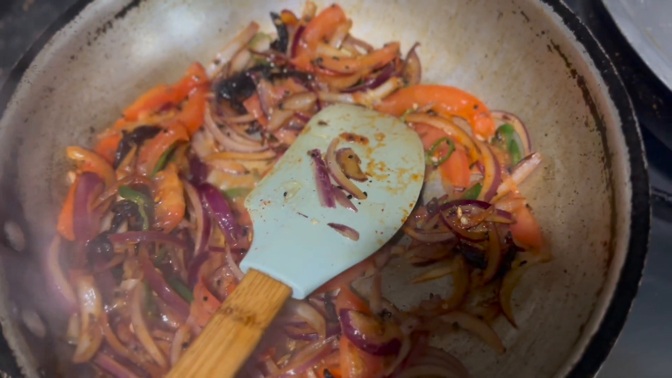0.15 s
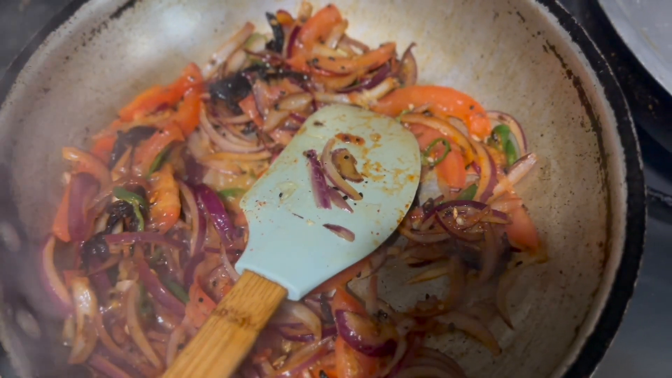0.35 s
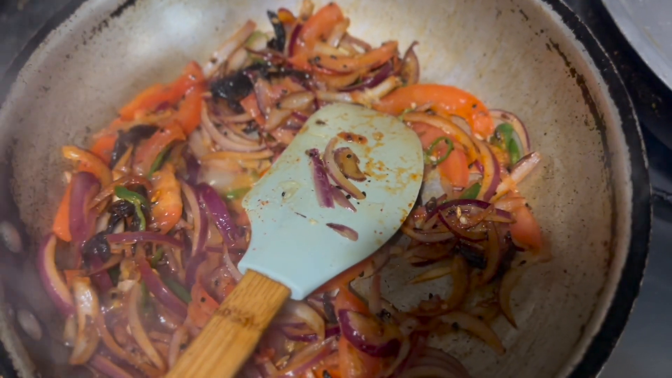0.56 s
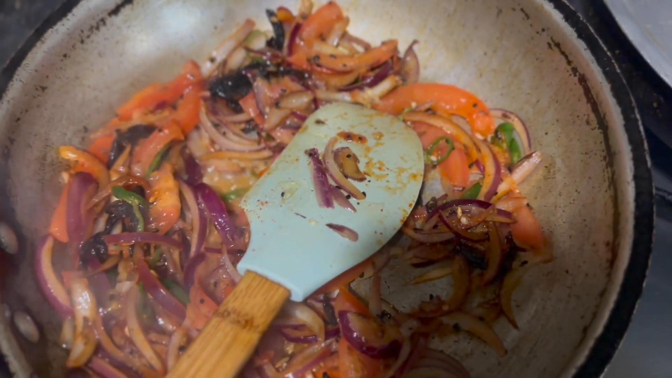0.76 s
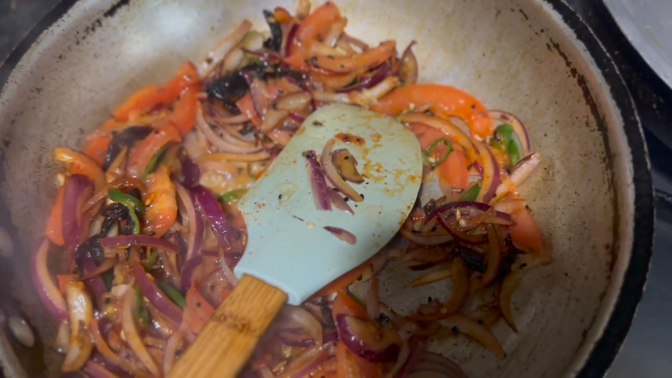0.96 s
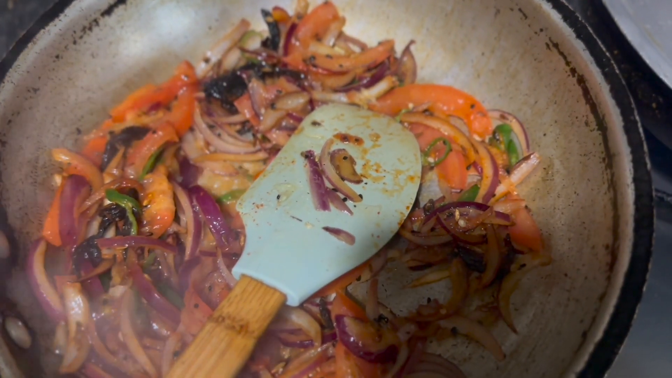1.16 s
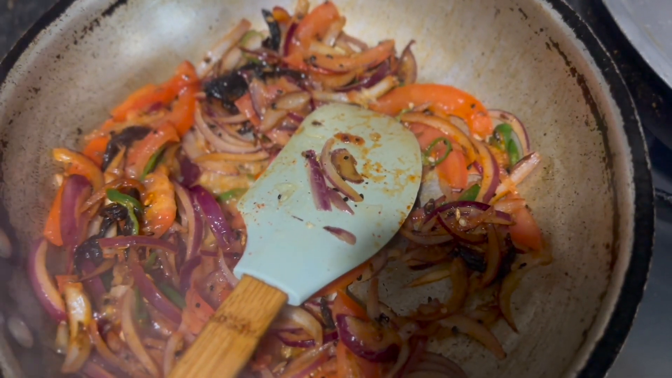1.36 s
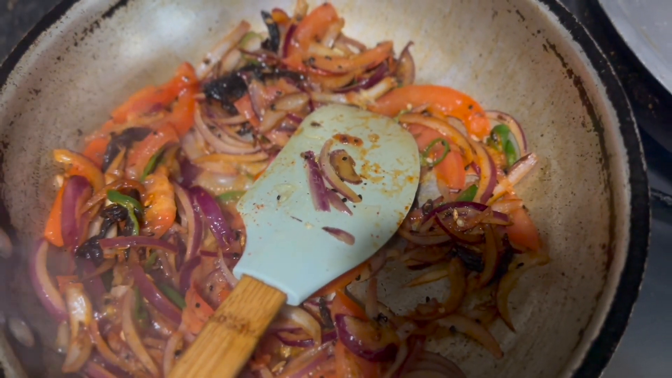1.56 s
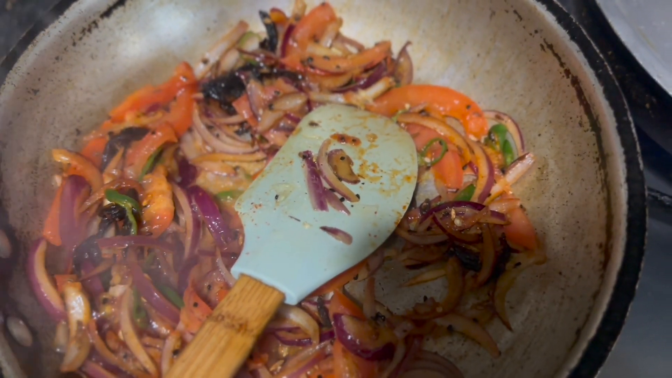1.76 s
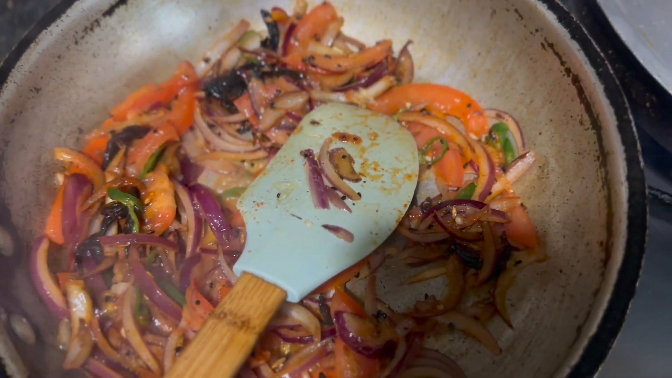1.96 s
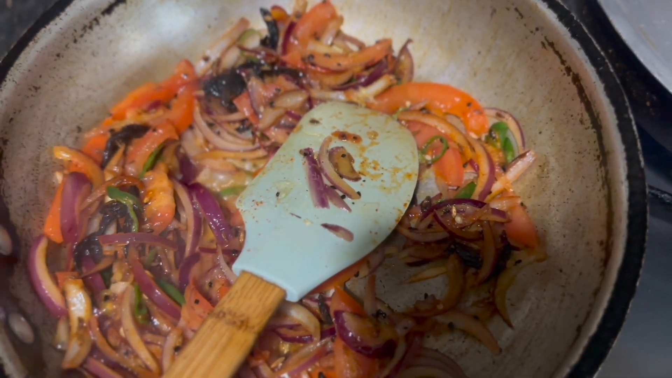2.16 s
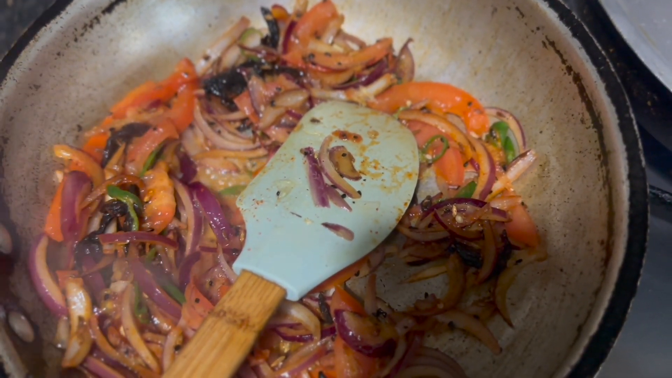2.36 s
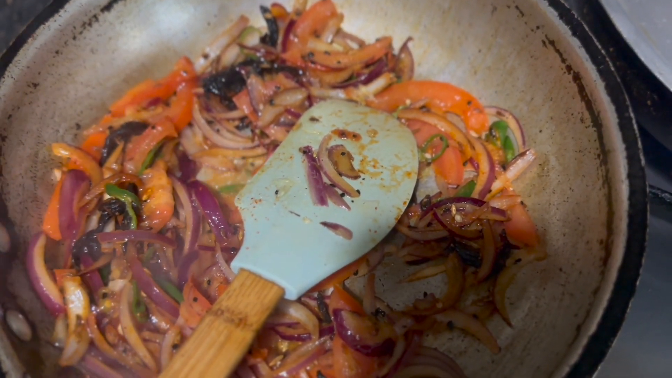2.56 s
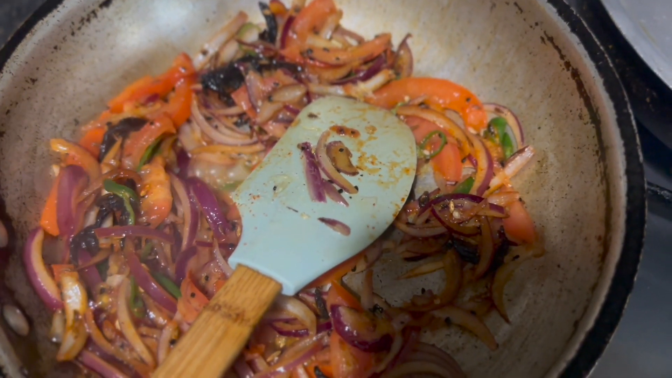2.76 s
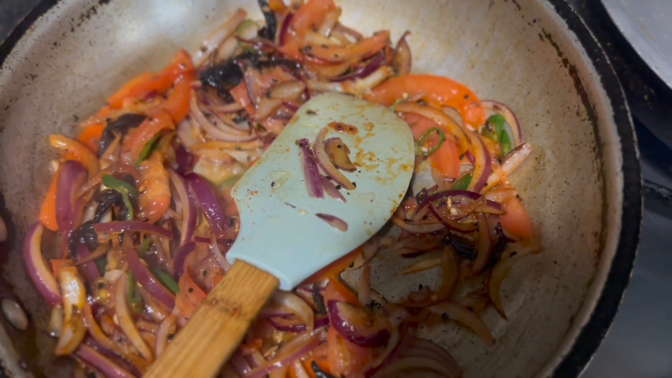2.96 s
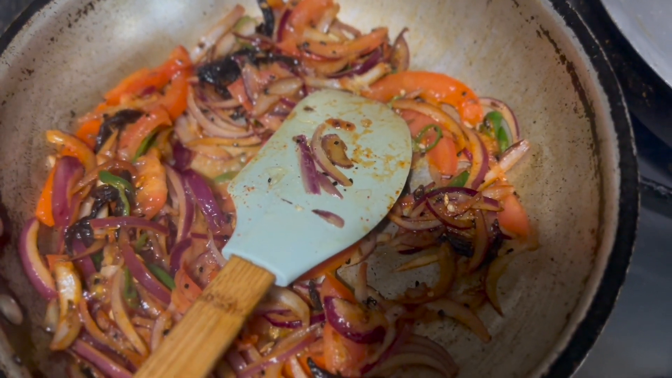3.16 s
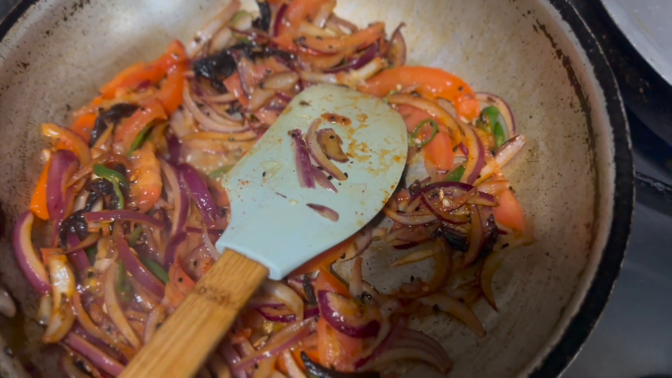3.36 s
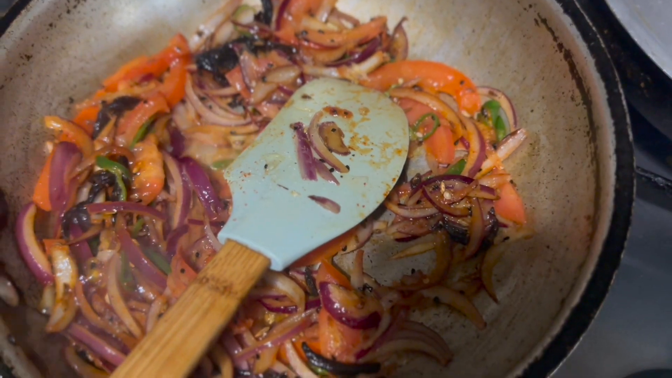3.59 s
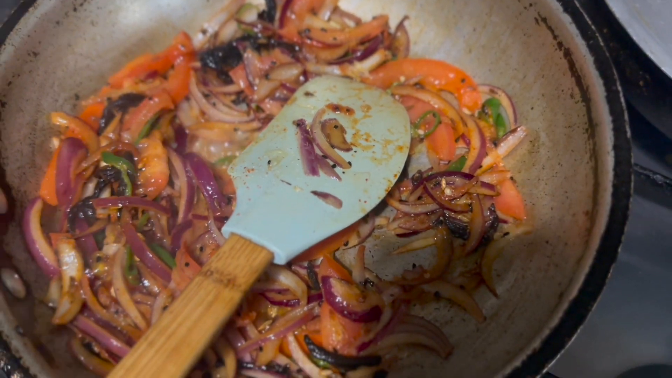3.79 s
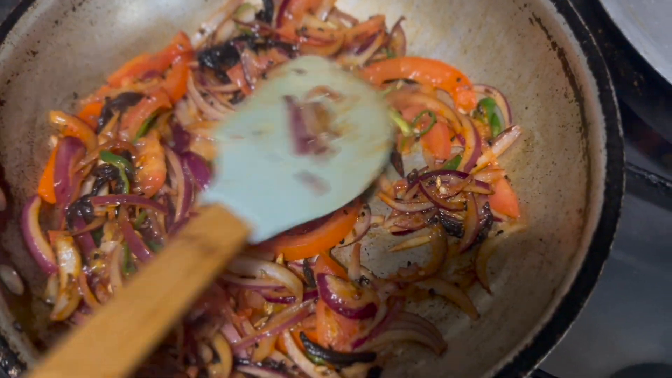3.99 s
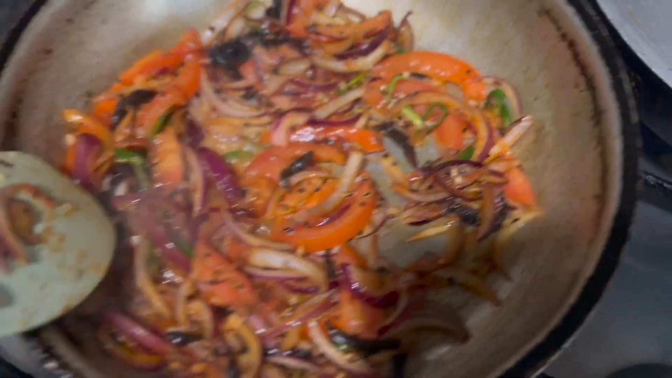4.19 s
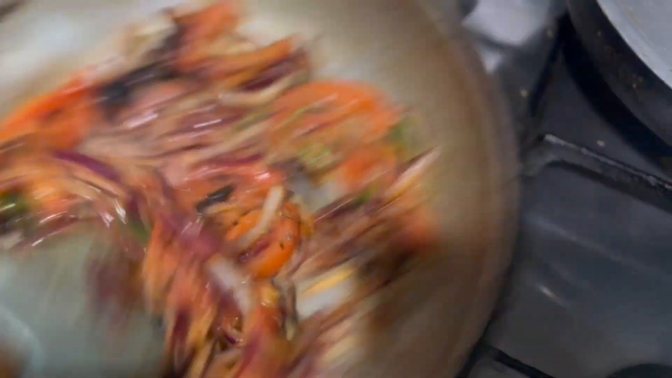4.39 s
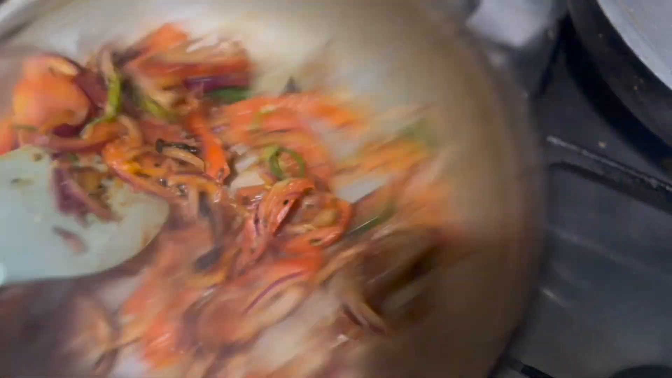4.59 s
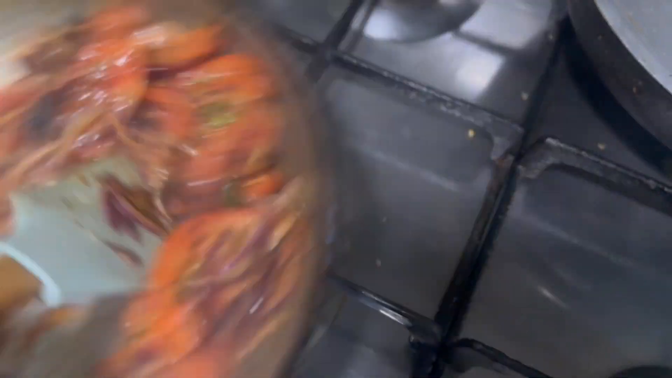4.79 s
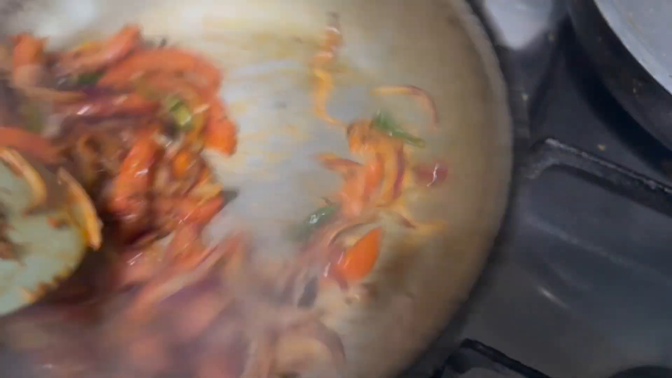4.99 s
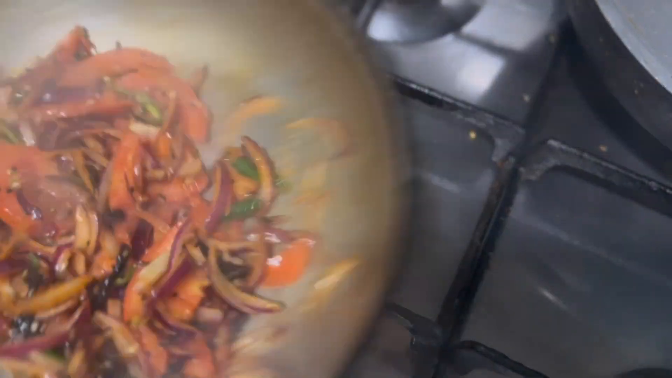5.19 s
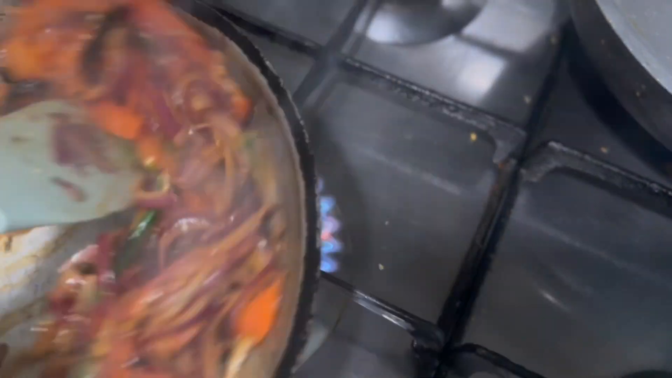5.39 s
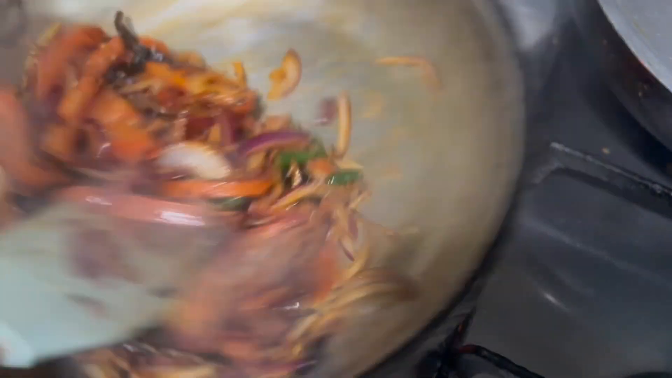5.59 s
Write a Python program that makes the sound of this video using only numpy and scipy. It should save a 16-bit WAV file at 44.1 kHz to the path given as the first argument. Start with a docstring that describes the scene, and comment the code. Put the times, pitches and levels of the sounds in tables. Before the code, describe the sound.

Steady wet frying fills the first four seconds, crisp and fizzy, sinking very slightly, with barely noticeable low handling bumps and a quiet gas flame. Then brisk stirring takes over: a soft-bladed spatula rubs and stutters across the metal, knocks it with short ringing clacks, thumps dully and crunches the slices, while wet food hisses louder. Heard from just above the pan, wide in stereo, with little room.

```python
"""At a gas stove, just above a metal pan: sliced onion and tomato fry, and after four seconds get stirred.
Countless tiny steam bursts, made as random clicks through resonances, sizzle and spit over the low flutter
of the burner, which is filtered noise. A silicone spatula scrapes in juddering slips and knocks in short
falling tones that ring the pan's modes. Dull low thuds are decaying tones, soft at first and firm once the
stirring starts; slices crunch, and wet food on hot metal lifts the sizzle and flares into hiss."""
import sys
import numpy as np
from scipy import signal
from scipy.fft import rfft, irfft, next_fast_len
from scipy.io import wavfile
from scipy.ndimage import uniform_filter1d

SR = 44100
rng = np.random.default_rng(int(sys.argv[2]) if len(sys.argv) > 2 else 0)


def digitize_waveform(pressure):
    """Quantize a signal to 16-bit integers and store it at the path in sys.argv[1].

    Rows of a 2-D input are taken as channels; values are limited to [-1, 1].
    """
    field = np.atleast_2d(pressure).T
    bounded = np.clip(field, -1, 1)
    quanta = np.round(bounded * 32767).astype(np.int16)
    wavfile.write(sys.argv[1], SR, quanta)


N = 248724
T = np.arange(N) / SR  # s
# padded transform length and its frequencies, nudged off zero for the logarithm
SIZE = next_fast_len(N + SR // 2)
HZ = np.arange(SIZE // 2 + 1) * SR / SIZE + 1e-3
TOP_HZ = 15780  # upper edge of the whole sound

# colour of the fine sizzle: pitch_hz, relative_density_db_per_hz
SIZZLE_COLOUR = [(3000, -30), (6500, -14), (7400, -6), (8400, -.5), (9500, 0), (10900, 0), (12000, -2.7),
                 (13000, -3.2), (14300, -1.7), (15700, -1.5), (16500, -40)]
# colour of the coarse, wet fizz: pitch_hz, relative_density_db_per_hz
FIZZ_COLOUR = [(150, -21.5), (330, -8), (470, -8.5), (640, -13), (800, -4.5), (1150, -6.5), (2000, -1),
               (2450, -2.5), (3300, 0.5), (4000, -2), (5000, -0.5), (6300, -1.5), (9000, -7), (15000, -21)]
# hollow of the pan that colours the fizz: pitch_hz, width_hz, level_db
PAN_HOLLOW = [(760, 47, -5.5), (924, 140, -7.5), (1380, 34, 4), (1477, 14, 4.5), (1847, 4, 4),
              (3743, 16, 1)]
# how hard the food is being turned as the spatula lifts and digs in: time_s, amount_0_to_1
STIRRING = [(3.85, 0.09), (4.22, 0.17), (4.39, 0.65), (4.48, 0.82)]
# wet clumps landing on hot metal: start_s, end_s, level_db, centre_hz, width_hz (of each of two filter passes)
FLARES = [(4.42, 4.482, -28, 13400, 3500), (4.446, 4.552, -27.5, 7550, 8000),
          (4.52, 4.63, -24.5, 13700, 3500), (4.62, 4.738, -23.5, 8100, 11300),
          (4.76, 4.81, -30, 13000, 7000), (4.75, 4.876, -29.5, 5600, 6000),
          (4.853, 4.937, -20.5, 8000, 7150), (4.936, 5.083, -27, 12800, 6500),
          (5.015, 5.07, -26.5, 5070, 5030), (5.145, 5.22, -25, 13800, 4000),
          (5.246, 5.328, -33, 13600, 3500), (5.458, 5.55, -26, 7900, 8000), (5.49, 5.63, -30, 13100, 4994)]
# spatula strokes: start_s, end_s, rub_db, rub_hz, pitch_bend_share (over the stroke), rasp_db, rasp_hz,
# judder_db, judder_rate_hz (mean)
STROKES = [(4.354, 4.472, -36, 598, 0.03, -54, 1800, -31.5, 125),
           (4.558, 4.59, -33, 477, -0.008, -45, 1750, -34, 124.9),
           (4.612, 4.652, -25.5, 440, -0.097, -25.5, 2430, -25.5, 154.9),
           (4.701, 4.722, -32, 620, 0.04, -26, 1680, -30, 120),
           (4.768, 4.82, -25.5, 556, -0.06, -26.5, 2350, -25, 150),
           (4.882, 4.915, -28.5, 600, 0.0072, -24.5, 1870, -30, 125.1),
           (4.931, 4.96, -24.5, 460, -0.09, -27.5, 1750, -26, 150),
           (5.078, 5.112, -36, 585, 0.034, -25.5, 1840, -32, 130),
           (5.158, 5.22, -29, 380, -0.0545, -29, 2920, -23, 151.9),
           (5.335, 5.38, -27, 580, -0.017, -30.5, 1797, -24, 147.9),
           (5.44, 5.47, -29, 721, -0.034, -28, 1800, -34, 140),
           (5.481, 5.517, -27.5, 540, 0.083, -26, 2800, -24, 144.8)]
# modes the pan rings with: pitch_hz, relative_level_db, t60_s
PAN_MODES = [(294, 8, 0.11), (338, 7, 0.09), (421, 6.5, 0.086), (476, 9, 0.066), (603, -1, 0.014),
             (683, 6.5, 0.06), (769, 5.5, 0.09), (1810, 10.5, 0.066), (1720, 7, 0.052), (2307, 12.5, 0.094),
             (2466, 7, 0.057), (2990, 8, 0.019), (3750, 12, 0.039), (4430, 10, 0.05)]
# spatula knocks: start_s, level_db, settled_pitch_hz, damping_width_hz, tick_db
KNOCKS = [(4.4035, -18, 650, 130, -31), (4.565, -27, 477, 130, -36), (4.6074, -9.5, 622, 180, -6),
          (4.612, -15, 350, 120, -28), (4.645, -20, 2150, 500, -14), (4.658, -6, 4100, 550, -11),
          (4.706, -26, 660, 110, -28), (4.7198, -23, 1600, 500, -11), (4.7645, -18, 520, 260, -12),
          (4.7885, -16, 640, 170, -20), (4.896, -17, 1700, 170, -12), (4.941, -19, 430, 160, -16),
          (5.1008, -17, 480, 250, -11), (5.161, -24, 640, 160, -24), (5.3128, -15, 550, 189.7, -30),
          (5.3378, -15, 577, 180, -19), (5.3632, -19, 650, 200, -24), (5.452, -23, 640, 129.7, -25),
          (5.484, -20, 490, 150, -23), (5.5488, -13, 1300, 500, -8)]
# dull low thuds, soft at first, firm once the stirring starts:
# start_s, relative_level_db, settled_pitch_hz, t60_s, relative_squash_db
THUDS = [(0.453, -39, 188, 0.11, -50), (0.531, -30, 181, 0.13, -40), (0.553, -30, 114, 0.058, -44),
         (.572, -42, 129, 0.11, -49), (0.887, -40, 408, 0.11, -45), (2.09, -41.5, 175, 0.26, -47.5),
         (2.158, -36.5, 88, 0.59, -56), (2.469, -36, 120, .1, -47), (2.566, -36, 103, 0.12, -61),
         (3.262, -35.5, 108, 0.18, -47), (3.347, -33.5, 114, 0.11, -48), (3.729, -39.5, 240, 0.076, -55),
         (4.008, -33, 113, 0.088, -56), (4.213, -32.5, 278, 0.052, -40), (4.322, -35, 120, .2, -48),
         (4.414, -21.5, 130, .1, -29.5), (4.619, -9.5, 136, 0.059, -27), (4.6686, -13, 85, .1, -34),
         (4.7304, -12.5, 92, .105, -31), (4.822, -18, 100, 0.097, -30), (4.908, -19.5, 96, .085, -32),
         (5.006, -27, 110, .12, -40), (5.113, -12.5, 128, 0.061, -28), (5.32, -22, 128, 0.088, -36),
         (5.386, -21, 120, 0.098, -38), (5.466, -27, 112, .07, -38), (5.5609, -11, 119, 0.084, -31)]
# roar of the gas flame: pitch_hz, relative_density_db_per_hz
FLAME_COLOUR = [(18, -34), (40, -1), (65, 3), (100, 6.5), (150, -1.5), (220, -13.5), (450, -21), (900, -34)]
# stereo image by pitch, nearly mono at 10-13 kHz: pitch_hz, left_minus_right_db, likeness_0_to_1
STEREO_IMAGE = [(94, 1.1, 0.97), (239, 3.5, 0.84), (417, 2, 0.64), (676, 6, 0.03), (950, 5, 0.88),
                (1420, 2.5, 0.33), (2000, 1.5, 0.25), (3050, 2, 0.34), (4450, 5, 0.36), (6000, 3, 0),
                (7800, 5, 0.56), (9960, -2.5, 0.35), (10130, 2, 1), (12900, -1, 1), (15000, 0.5, 0.45)]
# stereo phase by pitch: pitch_hz, left_lead_rad
STEREO_PHASE = [(150, 0), (500, .4), (850, 0), (1400, .7), (2400, 2.8), (3300, 3), (4600, 0), (6300, 1),
                (7800, 2.4), (10500, .1), (13400, -.2), (15700, -2.5)]

# starting points for the frying layers, and how fast they sink as the food dries
SIZZLE_BASE_DB, FIZZ_BASE_DB, DRYING_DB_PER_S = -30, -33, 0.41
# lift from fresh food on the metal, per unit of stirring
STIR_SIZZLE_DB, STIR_FIZZ_DB = 6, 6
FLARE_RISE_S, FLARE_FALL_S = 0.02, 0.047
JUDDER_LAG_S = 0.013  # the blade starts to judder this long after a stroke begins
FLAME_DB = -50


def frying(fine_db=1.5, wet_db=3.0, spit_db=-15.5, pop_db=-15, grain_db=-10, flicker_db=0.5, heap_db=4.0):
    """Steam bursts through the oil: fine sizzle thickened by ringing grains, coarse fizz, spits and pops."""
    sizzle_db, fizz_db = frying_levels()
    fine, = spectra(SIZZLE_COLOUR)
    coarse, = spectra(FIZZ_COLOUR)
    hollow = 1 + sum(undb(db) * resonance(hz, width) for hz, width, db in PAN_HOLLOW)
    sizzle = unit(filtered(bursts(16000, 2.6), undb(fine))) * undb(fine_db)
    fizz = unit(filtered(bursts(12000, 3.8), undb(coarse) * hollow)) * undb(fizz_db + wet_db)
    spits = unit(filtered(bursts(45, 2.9), resonance(7300, 9000))) * undb(spit_db)
    # larger blisters of juice pop, each at its own pitch
    pops = ringing_grains(count=300, ring_s=0.00088, spread_db=2.0, glide=.05, low_hz=1200, high_hz=7430)
    top = sizzle + spits + pops * undb(pop_db) + ringing_grains() * undb(grain_db)
    top = top * undb(sizzle_db) * undb(flicker_db * walk(14)) + flaring()
    # stirring heaps the wet food on the left
    heap = heap_db * stirring()
    wet = stereo(fizz * undb(flicker_db * walk(25.0))) * undb([heap / 2, -heap / 2])
    return stereo(top) + wet


def frying_levels():
    """Sizzle and fizz in dB: they sink as the food dries and rise with stirring."""
    dried_db = DRYING_DB_PER_S * T
    sizzle_db = SIZZLE_BASE_DB - dried_db + STIR_SIZZLE_DB * stirring()
    fizz_db = FIZZ_BASE_DB - dried_db + STIR_FIZZ_DB * stirring()
    return sizzle_db, fizz_db


def stirring():
    """How hard the food is turned over time: nearly still at first, then rising to a steady stir."""
    return np.interp(T, *np.transpose(STIRRING))


def ringing_grains(count=2400, ring_s=0.0071, spread_db=3, glide=0.0093, low_hz=7000, high_hz=15000):
    """Brief ringing grains at random pitches that glide up slightly; two unrelated sets."""
    t = T[:SR // 30]
    when, tone, size, side = rng.random((count, 4)).T[:, :, None]
    hz = low_hz + (high_hz - low_hz) * tone
    level = undb(-spread_db * np.log(size + 0.045))
    grains = level * np.exp(-t / ring_s) * np.sin(2 * np.pi * hz * t * (1 + glide * t / t[-1]))
    # the second set lies after the first in one long row
    where = (when * (N - len(t))).astype(int) + np.arange(len(t)) + N * (side > .5)
    return unit(np.bincount(where.ravel(), grains.ravel(), 2 * N).reshape(2, N))


def flaring():
    """Each wet clump that meets hot metal flashes into steam, with a hiss of its own colour."""
    steam = rfft(bursts(17000, 4.2), SIZE)
    out = 0
    for start, end, db, hz, width in FLARES:
        hiss = unit(irfft(steam * resonance(hz, width) ** 2, SIZE)[:, :N])
        out = out + hiss * gate(start, end, FLARE_RISE_S, FLARE_FALL_S) * undb(db)
    return out


def scraping(pan, rasp_width_hz=1000, wander=.16, grip=0.58, jerk_db=-4, jerk_spread_db=3.0,
             bite_s=0.0063, release_s=0.022):
    """The rubbery blade judders: jerks and fine slips ring a dull rub and a bright rasp that bend in pitch."""
    middles = [(row[0] + row[1]) / 2 for row in STROKES]
    rate = np.interp(T, middles, [row[-1] for row in STROKES])
    turns = np.cumsum(rate * (1 + wander * walk(70))) / SR
    judder = np.cos(2 * np.pi * turns)
    shake = unit(judder * undb(2 * walk(56)))
    # one jerk per judder turn, and slips that bunch around it
    jerks = unit(np.diff(np.floor(turns), prepend=0) * undb(jerk_spread_db * rng.standard_normal(N)))
    slips = bursts(2500, 2.7) * (1 + grip * judder)
    slips[0] += jerks * undb(jerk_db)
    # the pan gives its phase here and its strength in rub and rasp
    slips = rfft(unit(slips), SIZE) * np.exp(1j * np.angle(pan))
    out = np.zeros((2, N))
    for start, end, rub_db, rub_hz, bend, rasp_db, rasp_hz, shake_db, _ in STROKES:
        rub = unit(np.abs(pan * resonance(rub_hz, rub_hz * 2.13) ** 2)) * undb(rub_db)
        rasp = unit(np.abs(pan * resonance(rasp_hz, rasp_width_hz))) * undb(rasp_db)
        ring = irfft(slips * np.hypot(rub, rasp), SIZE)[:, :N]
        # bent time slides the pitch along the stroke
        travel = np.clip((T - start) / (end - start), 0, 1)
        bent = T + bend * (end - start) * travel * (travel - 1) / 2
        slid = np.array([np.interp(bent, T, part) for part in ring])
        out += slid * gate(start, end, bite_s, release_s)
        shaking = gate(start + JUDDER_LAG_S, end + JUDDER_LAG_S, bite_s, release_s / 2)
        out[0] += shake * shaking * undb(shake_db)
    return out


def pan_response(contact_db=-13):
    """The pan's modes, damped by the food, plus the dry crack of the contact itself."""
    # a mode's t60 sets its bandwidth
    modes = sum(undb(db) * resonance(hz, np.log(1000) / (np.pi * t60)) for hz, db, t60 in PAN_MODES)
    return modes / np.abs(modes).max() + undb(contact_db) * resonance(2470, 4200)


def knocking(pan, chatter_s=0.0026, chatter=0.04, tick_hz=3300, tick_width_hz=3000,
             sag=.2, sag_s=0.0028, pan_db=-6):
    """A short chattering push rings the blade, falling in pitch; the pan answers and a hard edge ticks."""
    t = T[:SR // 4]
    out = np.zeros((2, N + len(t)))
    tick = irfft(pan * resonance(tick_hz, tick_width_hz) ** 2, SIZE)[:len(t)]
    metal = irfft(pan, SIZE)[:len(t)]
    for s, db, hz, width, tick_db in KNOCKS:
        push = chatter * rng.standard_normal((2, len(t))) * np.exp(-t / chatter_s)
        push[0, 0] += 1
        cycles = hz * np.cumsum(1 + sag * np.exp(-t / sag_s)) / SR
        blade = np.sqrt(t) * np.exp(-np.pi * width * t) * np.sin(2 * np.pi * cycles)
        ring = blade + undb(pan_db) * signal.fftconvolve(blade, metal)[:len(t)]
        ring = undb(db) * ring / np.abs(ring).max() + undb(tick_db) * tick / np.abs(tick).max()
        start = int(s * SR)
        out[:, start:start + len(t)] += signal.fftconvolve(push, ring[None], axes=1)[:, :len(t)]
    return out[:, :N]


def crunching(crunch_db=-15, crunch_hz=2000, width_hz=3200, bite_s=0.00083, hold_s=0.0097, release_s=0.021):
    """A hard-edged knock crushes the slices caught under the blade: a brief, crisp crunch."""
    crush = sum(gate(s, s + hold_s, bite_s, release_s) * undb(tick_db) for s, _, _, _, tick_db in KNOCKS)
    colour = resonance(crunch_hz, width_hz) * resonance(crunch_hz, 4 * width_hz)
    return unit(filtered(bursts(3000, 1.4), colour)) * crush * undb(crunch_db)


def thudding(rise_share=0.053, sag=0.022, sag_s=0.0033, squash_hz=340, squash_width_hz=280,
             tail_hz=119, tail_db=-13, tail_rise_s=0.013, tail_t60_s=0.18):
    """Dull thuds: soft-edged low cycles that sag in pitch, a noisy squash and a low ringing tail."""
    t = T[:SR // 2]
    out = np.zeros(N + len(t))
    squash_level = np.zeros(N + len(t))
    squash = unit(filtered(rng.standard_normal(N), resonance(squash_hz, squash_width_hz) ** 2))
    tail_envelope = (1 - np.exp(-t / tail_rise_s)) * np.exp(-np.log(1000) * t / tail_t60_s)
    tail = undb(tail_db) * tail_envelope * np.sin(2 * np.pi * tail_hz * t)
    for s, db, hz, t60, squash_db in THUDS:
        pitch = hz * (1 + sag * np.exp(-t / sag_s))
        swell = (1 - np.exp(-(t / (rise_share * t60)) ** 2)) * np.exp(-np.log(1000) * t / t60)
        swell = swell / swell.max()
        thud = swell * np.sin(2 * np.pi * np.cumsum(pitch) / SR)
        start = int(s * SR)
        out[start:start + len(t)] -= undb(db) * (thud + tail)
        squash_level[start:start + len(t)] += undb(squash_db) * swell
    return out[:N] + squash * squash_level[:N]


def shuddering(shudder_db=-32):
    """The pan rocks in small low jolts, harder as the food is pushed about."""
    rocking = (0.78 * resonance(58, 30) + resonance(106, 63)) * resonance(93, 123)
    return unit(filtered(bursts(220, 2.5), rocking)) * undb(shudder_db) * stirring() ** 2


def burner(flutter_db=2):
    """The gas flame flutters low under the pan: dark noise with a wandering level."""
    colour, = spectra(FLAME_COLOUR)
    return unit(filtered(rng.standard_normal((2, N)), undb(colour))) * undb(FLAME_DB + flutter_db * walk(6.26))


def stereo(pair):
    """A middle and a side part become left and right, with level, likeness and phase set by pitch."""
    pan_db, likeness = spectra(STEREO_IMAGE)
    phase, = spectra(STEREO_PHASE)
    likeness = np.clip(likeness, 0, .995)
    mid, side = rfft(pair, SIZE) * np.sqrt([(1 + likeness) / 2, (1 - likeness) / 2])
    turn = undb(pan_db / 2) * np.exp(.5j * phase)
    return irfft([(mid + side) * turn, (mid - side) / turn], SIZE)[:, :N]


def bursts(rate, spread_db):
    """Two unrelated trains of random clicks (rate per second), most small and a few large."""
    chance, size = rng.random((2, N)), rng.standard_normal((2, N))
    sign = rng.choice([-1, 1], (2, N))
    return unit((chance < rate / SR) * sign * undb(spread_db * np.minimum(size, 3)))


def walk(rate):
    """Random levels held 1 / rate s and slewed twice; spread near 1."""
    k = max(int(SR / rate), 2)
    steps = np.repeat(rng.standard_normal(N // k + 1), k)
    return 1.3 * uniform_filter1d(uniform_filter1d(steps, k), k)[:N]


def gate(start, end, bite_s, release_s):
    """Attack, hold and release of one push."""
    return np.clip((T - start) / bite_s, 0, 1) * np.exp(-np.maximum(T - end, 0) / release_s)


def resonance(hz, width):
    """Response of one damped mode, gain 1 at its centre."""
    return 1 / (1 + 1j * (HZ ** 2 - hz ** 2) / (HZ * width))


def filtered(x, response):
    """Pass a sound through a frequency response."""
    return irfft(rfft(x, SIZE) * response, SIZE)[..., :N]


def spectra(rows):
    """The columns of a table as functions of log frequency."""
    hz, *columns = np.transpose(rows)
    return [np.interp(np.log(HZ), np.log(hz), c) for c in columns]


def undb(db):
    """Decibels to gain."""
    return 10 ** (np.asarray(db) / 20)


def unit(x):
    """Scale to rms 1."""
    return x / np.sqrt(np.mean(x ** 2))


def scene():
    """Frying food, spatula, pan and flame."""
    pan = pan_response()
    spatula = scraping(pan) + knocking(pan) + crunching()
    # the thuds reach both sides in the same polarity, a little louder on the left
    thuds = thudding() * undb([[.4], [-.4]])
    return frying() + stereo(spatula + shuddering() + burner()) + thuds


def record(dry):
    """A steep low-pass cuts the top."""
    return signal.sosfilt(signal.ellip(12, .1, 80, TOP_HZ, fs=SR, output="sos"), dry)


dry = scene()
out = record(dry)
digitize_waveform(out)
```